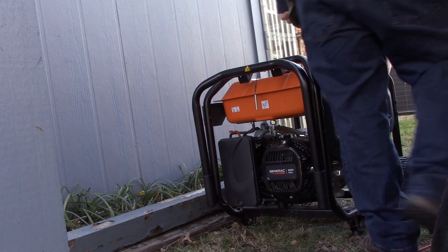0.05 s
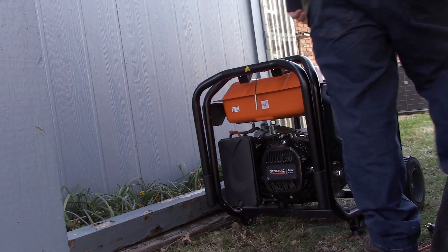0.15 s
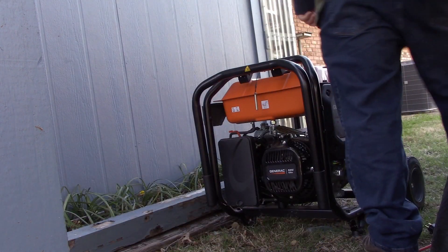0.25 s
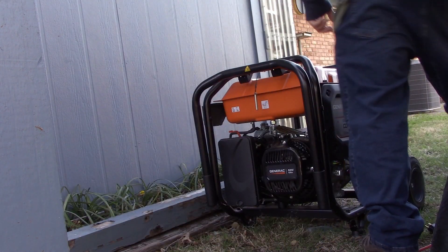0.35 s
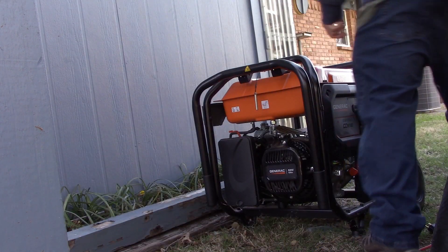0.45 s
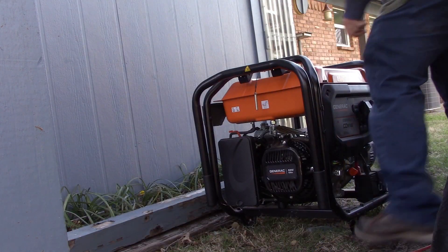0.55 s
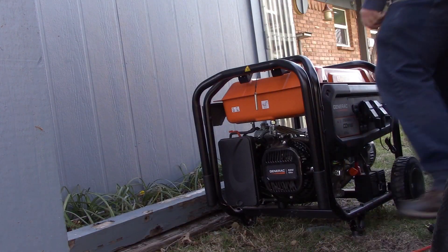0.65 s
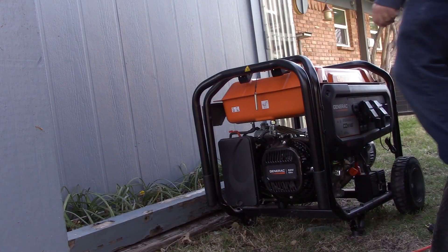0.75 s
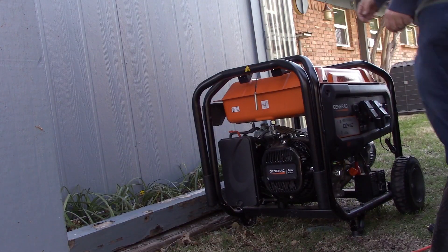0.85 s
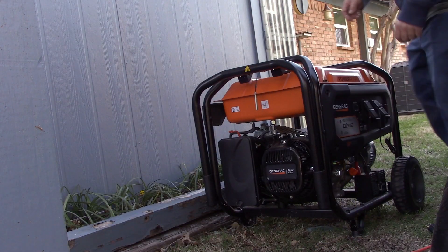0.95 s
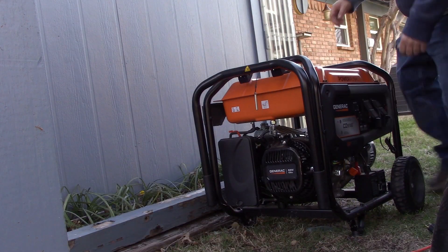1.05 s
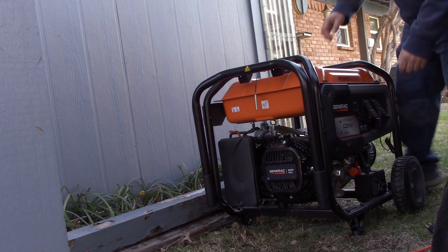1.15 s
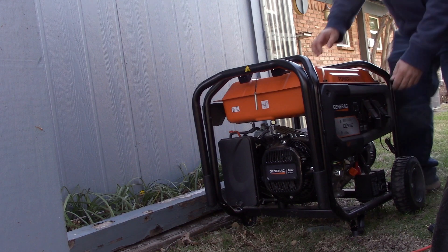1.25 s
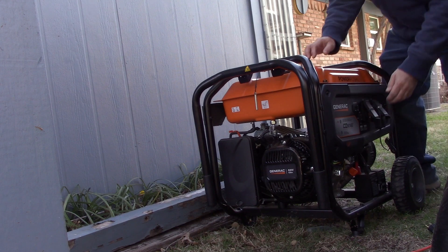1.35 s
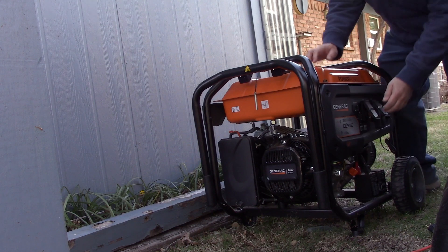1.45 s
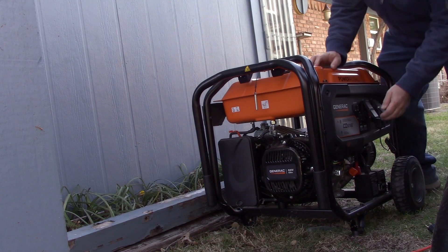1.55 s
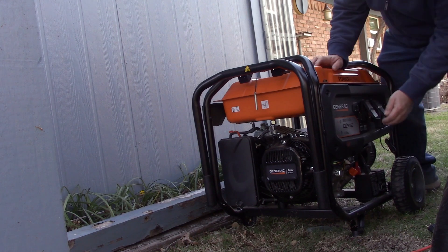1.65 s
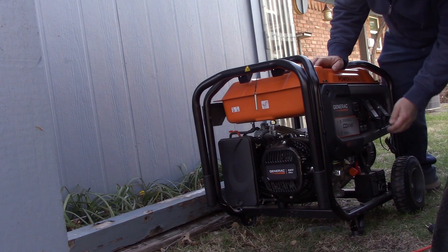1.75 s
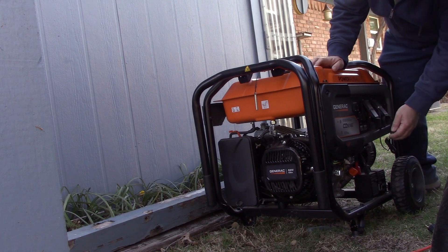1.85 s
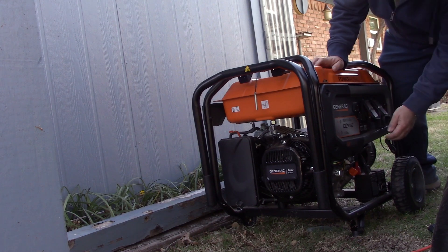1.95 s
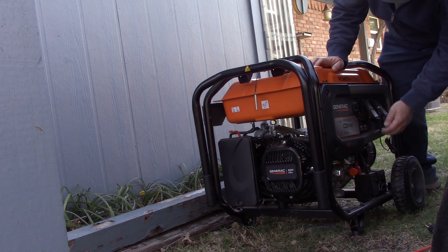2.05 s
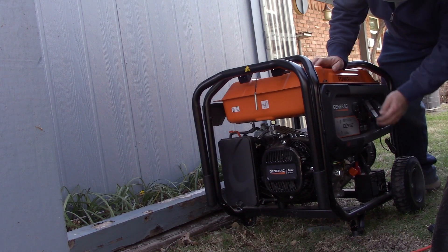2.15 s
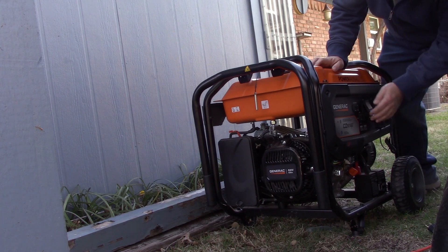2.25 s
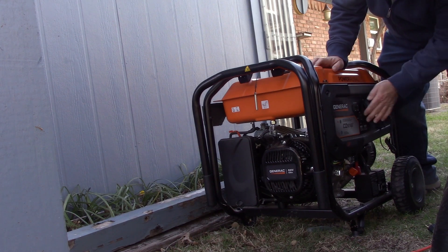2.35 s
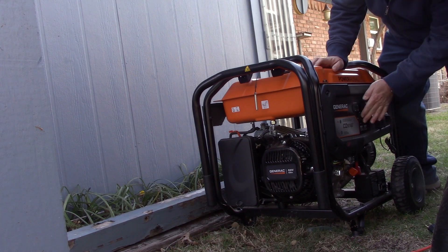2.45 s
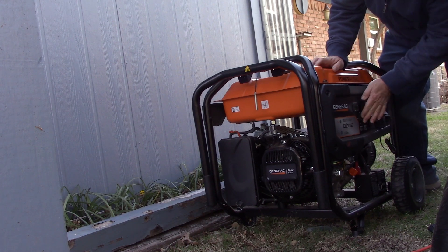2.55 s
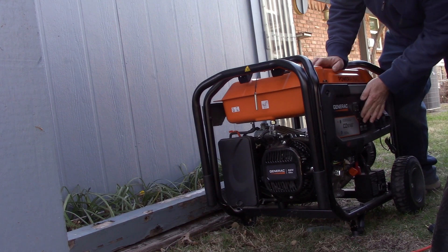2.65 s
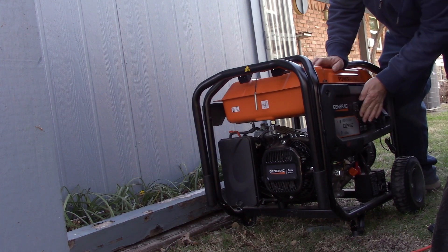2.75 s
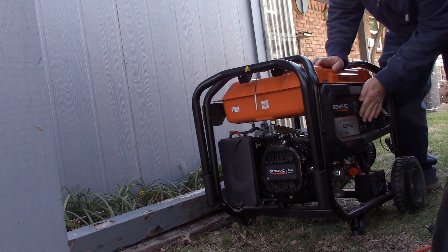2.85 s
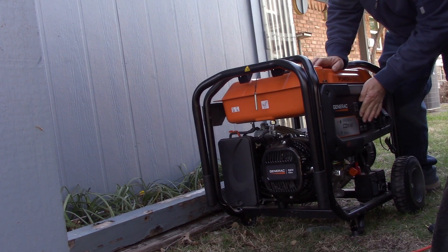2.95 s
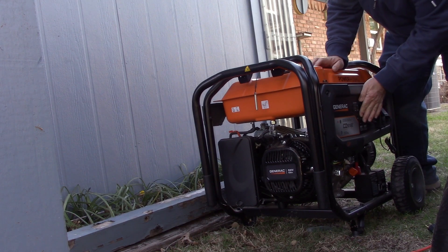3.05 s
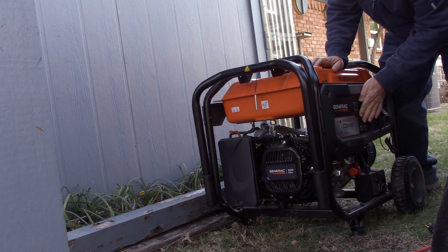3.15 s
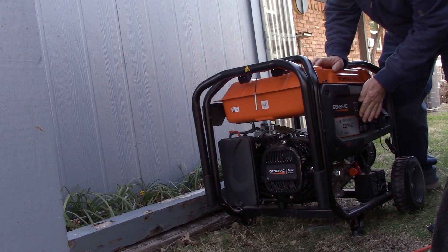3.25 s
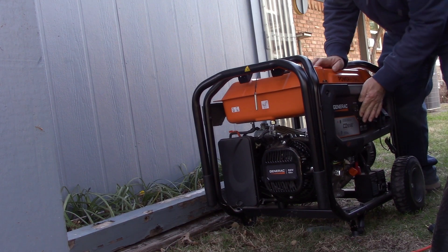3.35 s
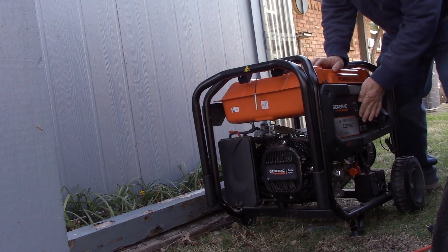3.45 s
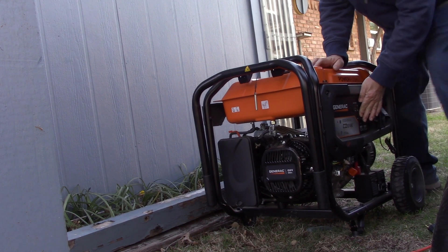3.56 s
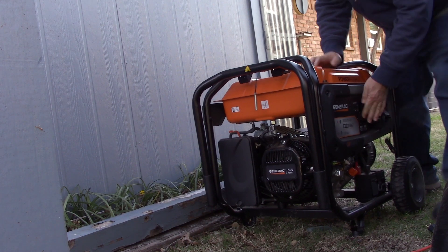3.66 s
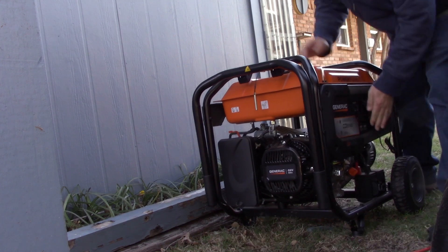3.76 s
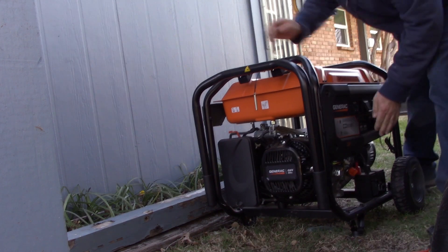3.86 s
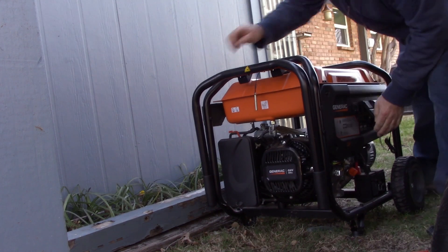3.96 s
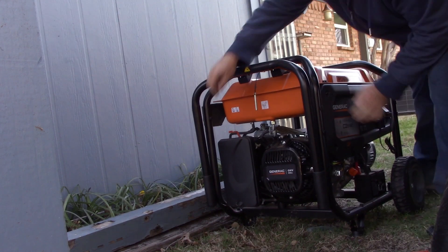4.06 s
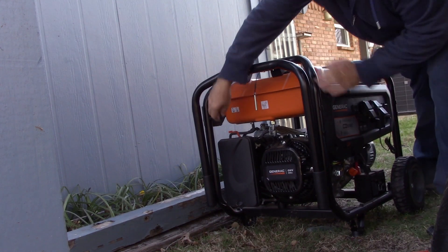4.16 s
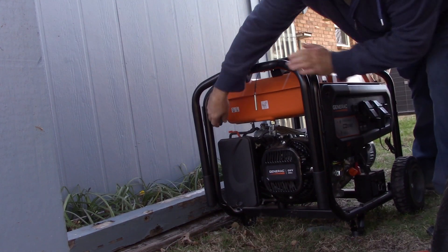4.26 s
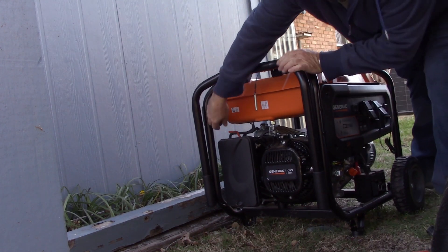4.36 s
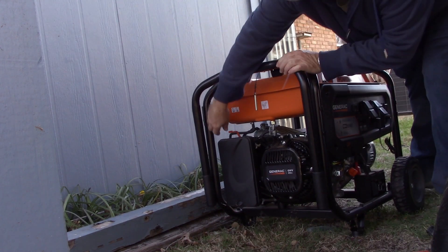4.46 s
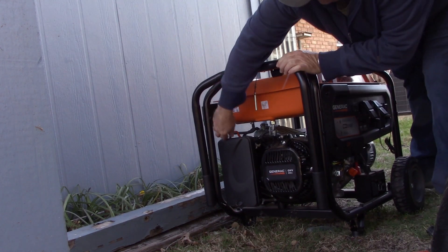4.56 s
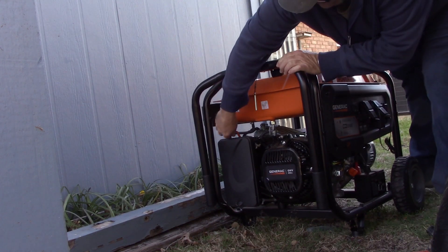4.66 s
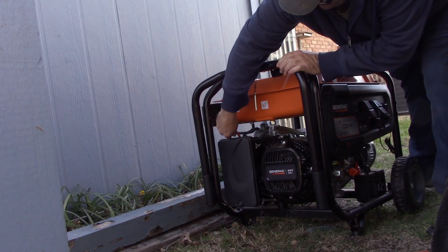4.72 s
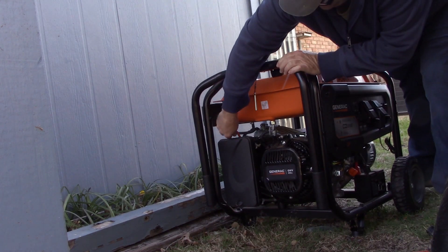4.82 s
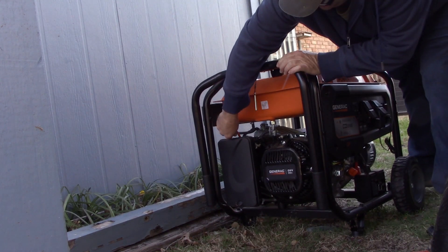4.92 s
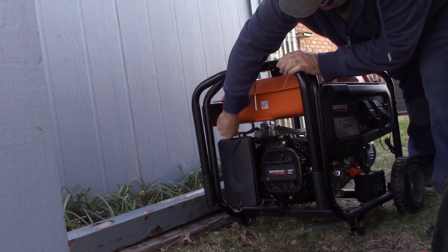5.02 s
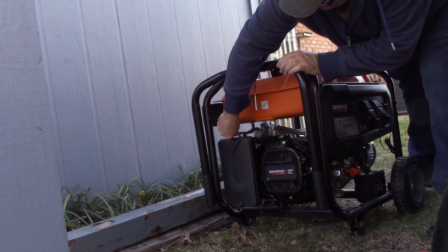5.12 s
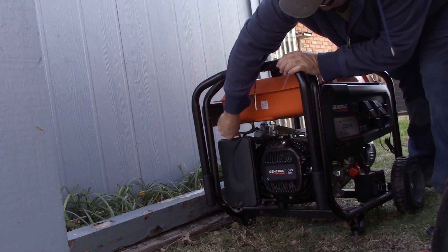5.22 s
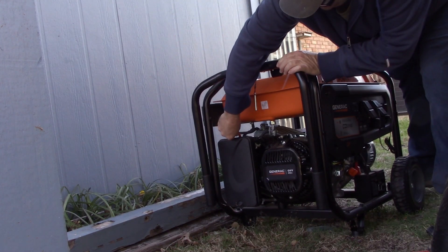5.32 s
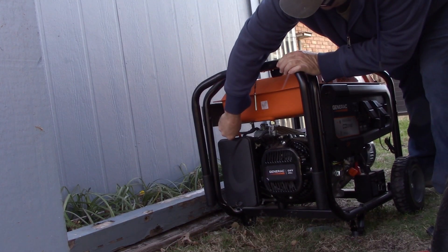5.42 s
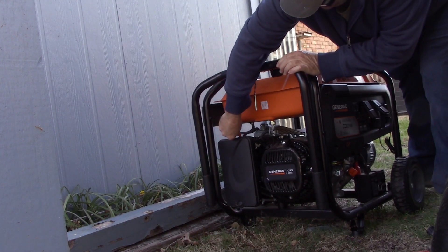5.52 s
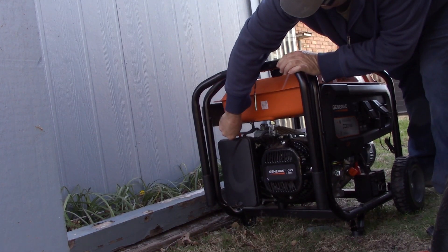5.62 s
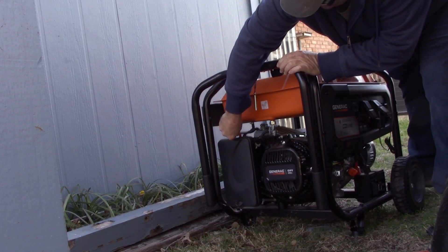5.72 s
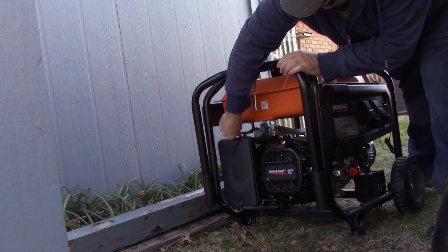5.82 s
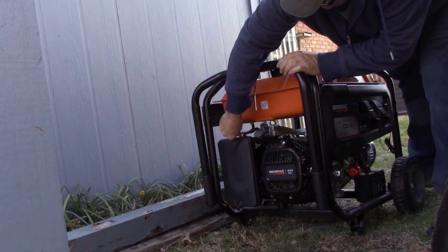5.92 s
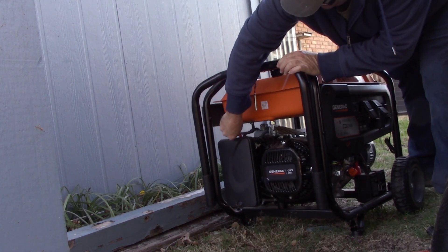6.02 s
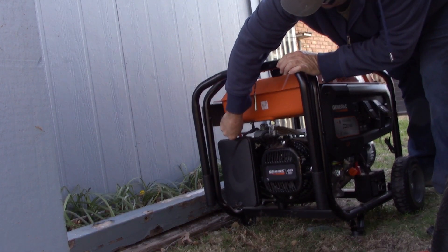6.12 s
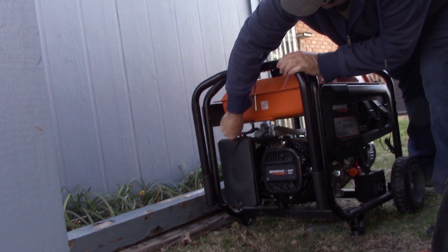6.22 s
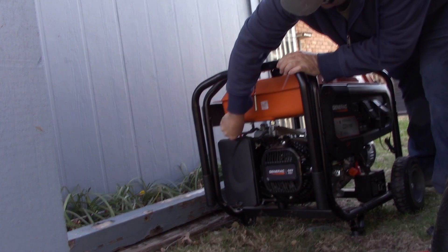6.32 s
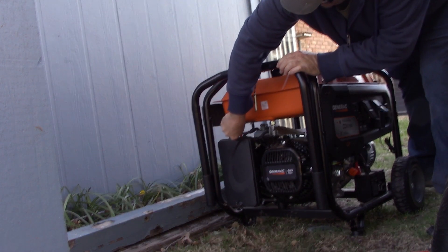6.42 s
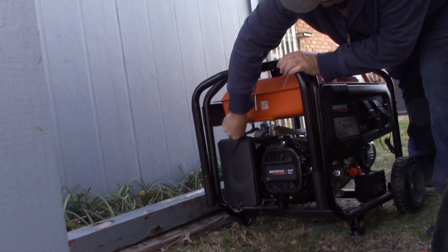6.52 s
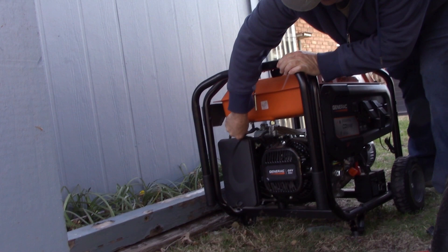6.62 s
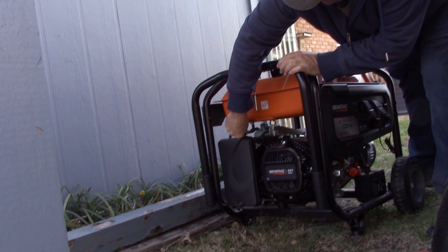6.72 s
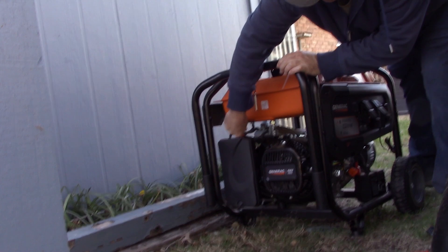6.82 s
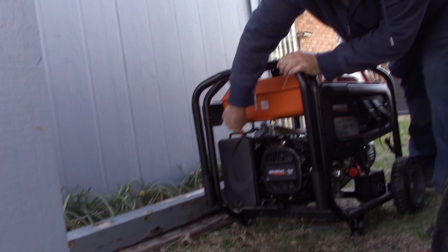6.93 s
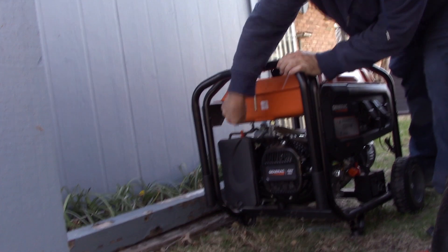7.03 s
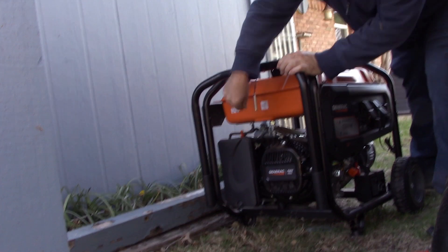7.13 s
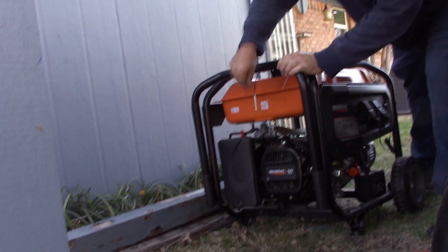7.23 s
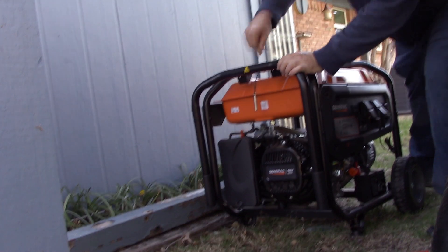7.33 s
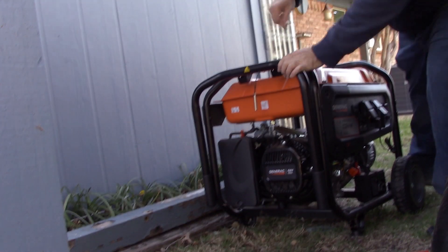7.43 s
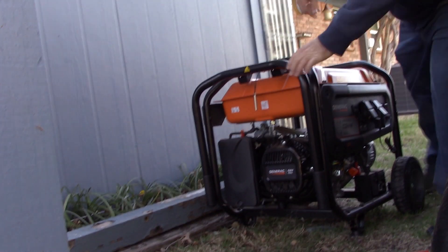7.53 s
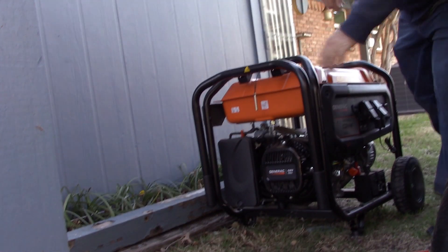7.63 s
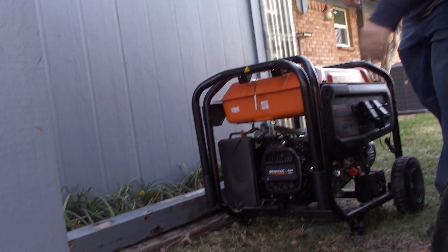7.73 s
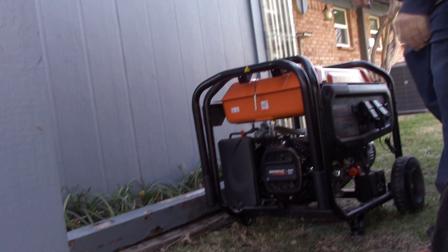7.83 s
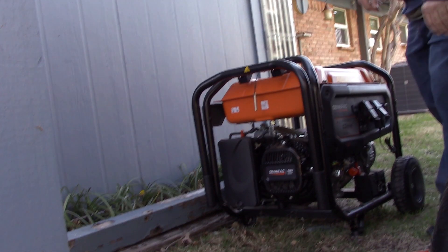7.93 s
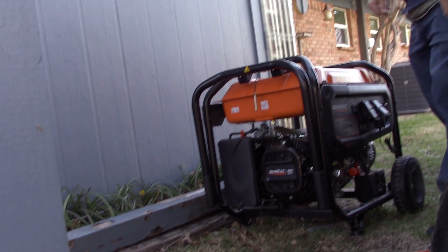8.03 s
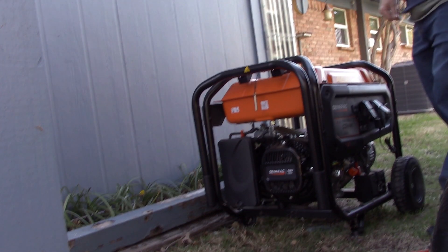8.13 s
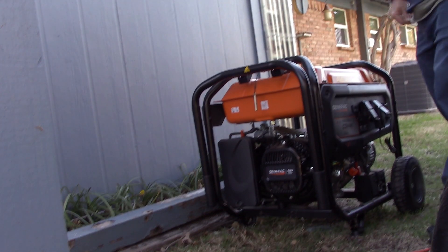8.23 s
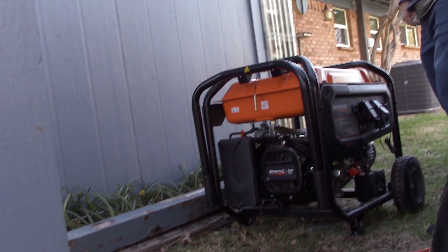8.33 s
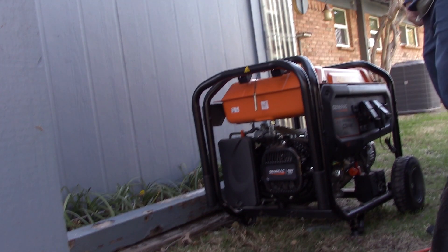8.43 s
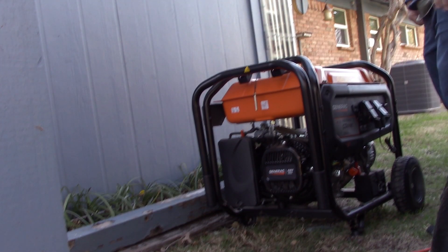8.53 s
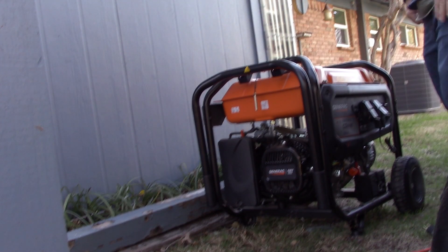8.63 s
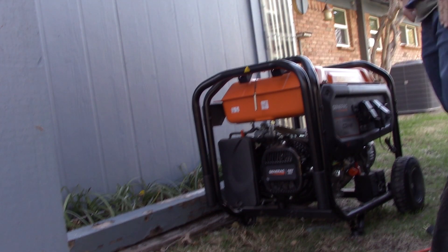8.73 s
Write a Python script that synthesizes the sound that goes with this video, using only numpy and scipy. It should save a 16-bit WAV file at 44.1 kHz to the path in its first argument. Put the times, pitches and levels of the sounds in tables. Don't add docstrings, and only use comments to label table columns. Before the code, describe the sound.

Faint neighbourhood hum, insects, soft shoes in grass and bird chirps open the scene. Rhythmic dry squeaks quicken, followed by a violent clank and short gear-grinding crank with whine and squeal. Puffs cough out; the level drops abruptly as the small engine starts slowly, lumpy and thudding with hissing intake gulps, then accelerates to a constant muffled drone with clatter. Close outdoors, source slightly left.

```python
import sys
import numpy as np
from scipy import signal
from scipy.fft import rfft, irfft, next_fast_len
from scipy.io import wavfile
from scipy.ndimage import uniform_filter1d, map_coordinates

SR = 44100
rng = np.random.default_rng(int(sys.argv[2]) if len(sys.argv) > 2 else 0)


def convert_level_to_amplitude(level_db):
    exponent = np.asarray(level_db, float) / 20
    return 10 ** exponent


def persist_wave(psi):
    counts = np.round(np.clip(psi, -1, 1) * 32767).astype(np.int16)
    wavfile.write(sys.argv[1], SR, np.atleast_2d(counts).T)


N = 387198
T = np.arange(N) / SR


def unit(x):
    return x / np.sqrt(np.mean(x ** 2) + 1e-20)


def along(points, hz):
    f, v = np.transpose(points)
    return np.interp(np.log(hz + 1), np.log(f + 1), v)


def curves(rows):
    s, *cols = np.transpose(rows)
    return [np.interp(T, s, c) for c in cols]


def during(rows):
    return (T >= rows[0][0]) & (T <= rows[-1][0])


def arch(start, peak, end, db, drop_db=-20):
    shape_db = np.interp(T, [start, peak, end], [drop_db, 0, drop_db])
    return ((T >= start) & (T <= end)) * convert_level_to_amplitude(db + shape_db)


def wobble(rate, size=N):
    knots = rng.standard_normal(int(size * rate / SR) + 4)
    return map_coordinates(knots, [T[:size] * rate])


def filtered(x, response):
    m = next_fast_len(N + 8192)
    return irfft(rfft(x, m) * response(np.fft.rfftfreq(m, 1 / SR)), m)[..., :N]


def modes(table):
    def response(f):
        return sum((-1) ** k * convert_level_to_amplitude(db) * 1j * f * w / (c * c - f * f + 1j * f * w)
                   for k, (c, w, db) in enumerate(table))
    return response


def noise(spectrum, peaks=None, peak_db=0):
    def colour(f):
        lift = 1 + convert_level_to_amplitude(peak_db) * np.abs(modes(peaks)(f)) if peaks else 1
        return convert_level_to_amplitude(along(spectrum, f)) * lift
    return unit(filtered(rng.standard_normal(N), colour))


def kicks(times, sizes):
    return np.bincount(np.clip((np.asarray(times) * SR).astype(int), 0, N - 1), sizes, N)


def tone(hz, gain, blur_hz, flutter_db, flutter):
    phase = 2 * np.pi * np.cumsum(hz + blur_hz * wobble(300)) / SR
    return gain * convert_level_to_amplitude(3 + flutter_db * np.tanh(wobble(flutter))) * np.sin(phase)


# (f/Hz, level/dB)
INSECTS = [(2659, -63.5), (2821, -74), (3025, -68), (4350, -58.5), (4479, -90), (4613, -67.5)]
# (from t/s, to t/s, level/dB, fade/dB per s)
STROPHES = [
    (0, 0.957, -4, -11.5),
    (0.989, 2.706, 0.5, -10.5),
]
# (f/Hz, level/dB per Hz)
YARD = [(15, -52), (38, -13), (161, 4.5), (256, -4.5), (476, -13.5), (1070, -19.5), (1230, -21.5),
        (2480, -25.5), (2690, -22.5), (4140, -27.5), (4490, -27.5), (4870, -29), (10100, -42.5),
        (13600, -53), (16000, -81)]
# (t/s, peak level/dB)
STEPS = [
    (0.0194, -48),
    (0.5257, -50),
    (1.0494, -59),
    (1.1994, -57),
    (1.3094, -58),
    (1.3947, -60),
]
YARD_DB = -48


def yard():
    def turn(f):
        likeness = along([(100, .97), (1000, 0.89), (8000, 0.17)], f)
        return np.arccos(np.clip(likeness, -1, .97)) / 2
    hum = np.array([noise(YARD), noise(YARD)])
    mid, side = filtered(hum, lambda f: np.array([np.cos(turn(f)), np.sin(turn(f))]))
    hum = convert_level_to_amplitude(YARD_DB + 3.5 + 0.44 * wobble(9.6)) * np.array([mid + side, mid - side])
    chorus = sum(convert_level_to_amplitude(db + 3 + wobble(25)) * np.sin(2 * np.pi * (hz * T + .03 * wobble(40)))
                 for hz, db in INSECTS)
    vigour = convert_level_to_amplitude(-14.0) + sum((T >= a) * (T < b) * convert_level_to_amplitude(db + fade_db * (T - a))
                              for a, b, db, fade_db in STROPHES)
    s, db = np.transpose(STEPS)
    crunch = signal.fftconvolve(kicks(s, convert_level_to_amplitude(db - 12)), np.hanning(round(.08 * SR)), "same")
    grass = noise([(2000, -120), (3000, 3), (9000, -3), (15000, -10)])
    crunch = crunch * grass * convert_level_to_amplitude(3 * wobble(300))
    return hum + vigour * chorus * convert_level_to_amplitude([[-1.5], [1.5]]) + crunch


# (t/s, length/s, from f/Hz, to f/Hz, level/dB)
NOTES = [(.665, .027, 4500, 3250, -52), (.742, .03, 4900, 4200, -56), (.77, .06, 4700, 4400, -62),
         (.66, .04, 4700, 5300, -62), (.7, .04, 5200, 5950, -61), (.03, .04, 3500, 4000, -60),
         (.075, .04, 4000, 3350, -60), (.272, .04, 5150, 5150, -65), (.41, .22, 4380, 4520, -63),
         (.68, .03, 4700, 5200, -60), (.75, .07, 4900, 4700, -60), (.99, .08, 2660, 2660, -58),
         (.81, .03, 4100, 3200, -58)]
# (t/s, f/Hz, level/dB)
CALL = [
    (.718, 3460, -51),
    (.728, 4400, -44),
    (.739, 4560, -46),
    (.748, 3620, -39.5),
    (.765, 3280, -48),
    (.787, 2930, -48.5),
    (.818, 3680, -44.5),
    (.832, 3700, -61),
    (.86, 3640, -72),
]


def birds():
    hz, db = curves(CALL)
    song = tone(hz, during(CALL) * convert_level_to_amplitude(db), 62, 2.9, 119.7)
    for s, length, from_hz, to_hz, db in NOTES:
        glide = np.interp(T, [s, s + length], [from_hz, to_hz])
        swell = arch(s, s + 0.25 * length, s + length, db, drop_db=-6.0)
        song = song + tone(glide, swell, 66, 5.2, 119.5)
    return song + .5 * np.roll(song, round(.017 * SR))


# (t/s, squeak level/dB)
PULLEY = [(1.7131, -55), (1.9043, -43), (2.0215, -37), (2.1026, -37), (2.1797, -38), (2.248, -39.5),
          (2.307, -44), (2.3742, -46), (2.4417, -46), (2.4936, -48), (2.5524, -48), (2.6165, -49),
          (2.675, -46)]
# (f/Hz, level/dB per Hz)
BEARING = [(900, -120), (1200, -0.5), (1900, -8), (2700, 5), (3300, -4), (4200, -20), (5800, -17),
           (7000, -16), (8000, -29), (11000, -40), (15000, -48)]
KNOCK_DB, SCRAPE_DB, CHIRP_DB = -50, -53.5, -64
STROKE_DB = 3.5
OVERTONE_DB, OVERTONE_GROWS = -60.5, 0.91


def pulley():
    out, rasp, t = np.zeros(N + SR), np.zeros(N + SR), np.arange(SR // 8) / SR

    def swell(rise, t60):
        return (1 - np.exp(-t / rise)) ** 2 * convert_level_to_amplitude(-60 * t / t60)

    def glide(hz, fall, blur):
        return 2 * np.pi * np.cumsum(hz * (1 - fall * t) + blur * wobble(377, size=len(t))) / SR

    def add(track, start, sound):
        track[round(start * SR):][:len(t)] += sound

    for s, squeak_db in PULLEY:
        knock_db, scrape_db, chirp_db = np.array([KNOCK_DB, SCRAPE_DB, CHIRP_DB]) + rng.normal(0, 0.8, 3)
        overtone_db = OVERTONE_DB + OVERTONE_GROWS * (squeak_db + 45.0)
        slip = glide(2415, 0.21, 63)
        squeak = convert_level_to_amplitude(squeak_db - 2) * (np.sin(slip) + .35 * np.sin(1.09 * slip))
        squeak = squeak * convert_level_to_amplitude(3 * wobble(110, size=len(t)))
        overtones = np.sin(3 * slip) + 0.18 * np.sin(4 * slip) + .3 * np.sin(2 * slip) + .7 * np.sin(1.1 * slip)
        overtones = convert_level_to_amplitude(overtone_db + 14.5) * overtones
        scrape = convert_level_to_amplitude(scrape_db + 4) * convert_level_to_amplitude(STROKE_DB + 2) * np.sin(glide(3050, 22, 45))
        knock = convert_level_to_amplitude(knock_db + 6) * np.sin(glide(1680, 6, 80))
        chirp = convert_level_to_amplitude(chirp_db + 4) * np.sin(glide(6280, .3, 60))
        add(out, s - .011, squeak * (2.2 * swell(.009, .11) + .14 * swell(.0092, .55)))
        add(out, s - .011, .55 * overtones * swell(.008, .1))
        add(out, s - .004, scrape * swell(.006, .3) * (t < .022))
        add(out, s - .022, knock * swell(.005, .15))
        add(out, s - .012, chirp * swell(.004, .12))
        add(rasp, s - .017, convert_level_to_amplitude(scrape_db + 12.0) * swell(0.0055, 0.15))
    return out[:N] + rasp[:N] * noise(BEARING)


# (t/s, peak level/dB)
BLOWS = [
    (2.692, -29),
    (2.703, -22),
    (2.72, -6),
    (2.725, -3),
    (2.729, -5),
    (2.757, -13),
    (2.785, -15),
    (3.3325, -7.5),
    (3.385, -20),
    (3.519, -18),
]
# (f/Hz, level/dB, t60/s)
STEEL = [(285, -34, .5), (676, -4, 0.2), (1238, 0, 0.098), (1470, 5.5, 0.046), (1740, -18, 0.076),
         (2990, 2, 0.066), (2770, -12, 0.095), (3320, -23, 0.2), (3700, -2.5, 0.16), (4730, -12, .2),
         (6240, -22, 0.1), (7300, -24, 0.18), (7730, -11, 0.15)]
MESH_S = 2.938
RELEASE_DULL_DB, RELEASE_HZ = -14, 1600


def pinion_blows():
    out, t = np.zeros(N + SR), np.arange(SR // 4) / SR
    for s, db in BLOWS:
        ring = 0
        for hz, level, t60 in STEEL:
            dull_db = RELEASE_DULL_DB * (s > MESH_S and hz < RELEASE_HZ)
            fade = convert_level_to_amplitude(level + dull_db + rng.normal(0, 2.5) - 60 * t / min(t60, .14))
            ring = ring + fade * np.sin(2 * np.pi * hz * t)
        crack = signal.lfilter([.6], [1, -.4], rng.standard_normal(len(t)))
        crack = 3.34 * convert_level_to_amplitude(-60 * t / 0.062) * crack
        out[round(s * SR):][:len(t)] += convert_level_to_amplitude(db - 15) * (ring + crack)
    return filtered(out[:N], lambda f: 1j * f / (500 + 1j * f) / (1 + (f / 9000) ** 4))


# (t/s, level/dB)
GRIND = [
    (2.702, -25),
    (2.726, -11),
    (2.742, -17.5),
    (2.786, -19.5),
    (3.244, -22.5),
    (3.331, -25.5),
    (3.334, -20),
    (3.375, -28.5),
    (3.444, -27.5),
    (3.48, -45),
]
# (t/s, teeth per s)
MOTOR = [(2.735, 377), (2.76, 745), (2.8, 1006), (2.83, 1308), (2.86, 1415), (2.92, 1390), (2.99, 1420),
         (3.02, 1510), (3.08, 1605), (3.12, 1625), (3.19, 1710), (3.21, 1480)]
# (f/Hz, level/dB per Hz)
GEARS = [(35, -65), (60, -51), (272, -34), (362, -16.5), (815, -7), (1310, -9), (1640, -4.5), (1840, -10.5),
         (2840, -8.5), (5500, -18), (7150, -63), (12100, -120)]
# (f/Hz, level/dB per Hz)
BRUSHES = [(2350, -14.5), (4000, 3), (5350, -10), (7480, 0.5), (8450, -3), (10500, -6), (12300, -22.5),
           (14200, -21), (16000, -48)]
# (f/Hz, width/Hz, level/dB)
HOUSING = [(1980, 110, 4.5), (2710, 84, 2.5), (3370, 64, -2), (4330, 39, -29), (5880, 49, 1.5),
           (6400, 47, -25), (6680, 59, -5), (7600, 41, -17), (10500, 41, -15)]
# (t/s, level/dB)
THUDS = [
    (2.74, -26),
    (2.762, -27),
    (2.785, -29),
    (3.292, -33),
    (3.35, -39),
    (3.43, -38),
]
THUD_T60_S, FRAME_DB = .22, -42
BRUSH_DB, STALLED_DB, COAST_DB = -27.5, -12, -12
THROW_DB, THROW_END_S = -25, 2.742
KEY_OFF_S, BRUSH_FADE_S = 3.19, .06


def starter_grind():
    gears_db, teeth = curves(GRIND)[0], curves(MOTOR)[0]
    power = np.clip(1 - (T - KEY_OFF_S) / BRUSH_FADE_S, 0, 1)
    powered = convert_level_to_amplitude(BRUSH_DB + np.interp(teeth, [950, 1300], [STALLED_DB, 0]))
    brushes = power * powered + (1 - power) * convert_level_to_amplitude(gears_db + COAST_DB)
    brushes = np.where(T < THROW_END_S, convert_level_to_amplitude(THROW_DB), brushes)
    grit = convert_level_to_amplitude(1.3 * wobble(70) + 2 * wobble(400))
    grind = convert_level_to_amplitude(gears_db - 2.5) * noise(GEARS, HOUSING, peak_db=0)
    grind = grind + brushes * convert_level_to_amplitude(-.4) * noise(BRUSHES, HOUSING, peak_db=8)
    jolts = convert_level_to_amplitude(FRAME_DB) + sum(arch(s - .015, s, s + THUD_T60_S / 2, db, drop_db=-40) for s, db in THUDS)
    frame = noise([(120, -120), (190, -23.0), (270, 8.0), (340, -0.5), (800, -18), (1300, -120)])
    return (grind * grit + jolts * convert_level_to_amplitude(-1.5) * frame) * during(GRIND)


# (f/Hz, from t/s, peak t/s, to t/s, level/dB)
RINGING = [(285, 2.74, 2.765, 2.805, -22.5), (720, 2.72, 2.745, 2.77, -24),
           (1239, 2.754, 2.764, 2.8, -18.5), (1650, 2.76, 2.768, 2.81, -27), (3480, 2.83, 2.86, 2.92, -28),
           (2030, 3.333, 3.338, 3.365, -27.5), (2100, 3.44, 3.455, 3.47, -32),
           (3400, 2.93, 2.95, 3.02, -31), (4330, 2.92, 2.96, 3.05, -42), (7260, 3.0, 3.18, 3.225, -35),
           (3350, 3.05, 3.15, 3.2, -33)]
# (multiple of tooth rate, from t/s, peak t/s, to t/s, level/dB)
TEETH = [
    (1.59, 2.8, 2.83, 2.87, -25),
    (1.52, 2.87, 2.9, 2.93, -29),
    (2.53, 2.78, 2.797, 2.82, -27),
    (2.6, 2.84, 2.88, 2.92, -30),
]
# (from t/s, peak t/s, to t/s, level/dB, level at the ends/dB)
SQUEAL = [
    (2.928, 2.938, 2.95, -21, -8),
    (2.948, 2.963, 3.005, -18, -11),
    (2.99, 3.05, 3.5, -30, -6),
]
# (from t/s, peak t/s, to t/s, level/dB)
BITES = [
    (2.93, 2.98, 3.0, -28),
    (3.005, 3.02, 3.07, -23),
    (3.07, 3.095, 3.128, -19),
    (3.132, 3.146, 3.16, -19.5),
    (3.16, 3.183, 3.21, -20.5),
]
SQUEAL_HZ, SQUEAL_END_S = 2840, 3.31


def starter_tones():
    teeth = curves(MOTOR)[0]
    whine = sum(arch(*swell, drop_db=-5) for swell in BITES)
    squeal = sum(arch(*row) for row in SQUEAL) * (T < SQUEAL_END_S)
    tones = tone(teeth, whine, 35, 3, 110) + tone(SQUEAL_HZ, squeal, 55, 5, 130)
    for k, *swell in TEETH:
        tones = tones + tone(k * teeth, arch(*swell, drop_db=-12), 90, 5, 90)
    for hz, *swell in RINGING:
        tones = tones + tone(hz, arch(*swell, drop_db=-8), .025 * hz, 5, 110)
    return tones


# (f/Hz, width/Hz, level/dB)
MUFFLER = [(232, 70, 0), (322, 84, 2.5)]


def silencer(f):
    return modes(MUFFLER)(f) / (1 + 1j * f / 600) ** 3 * (1j * f / (170 + 1j * f)) ** 2


# (t/s, level/dB)
COUGHS = [
    (3.291, -14.5),
    (3.402, -20),
    (3.355, -22),
    (3.435, -18.5),
]


def first_coughs():
    s, db = np.transpose(COUGHS)
    return filtered(kicks(s, convert_level_to_amplitude(db + 37.5)), lambda f: silencer(f) + modes([(95, 90, -12)])(f))


STUMBLE = (13, 35)


def pattern(cycle, table, scatter_db, jitter):
    place, db = np.transpose(table)
    turns = np.arange(int(cycle[-1]) + 1)[:, None] + place
    uneven = np.interp(turns, [STUMBLE[1], STUMBLE[1] + 2], [2, 1])
    chance = rng.standard_normal(turns.shape + (2,))
    times = np.interp(turns + jitter * uneven * chance[..., 0], cycle, T)
    sizes = convert_level_to_amplitude(db + scatter_db * np.sqrt(uneven) * chance[..., 1])
    return kicks(times.ravel(), sizes.ravel())


def per_beat(speed):
    return np.sqrt(30 / np.maximum(speed, 8))


# (place 0-1, level/dB)
BEATS = [(0, 0), (.5, -17), (.7, -14), (.86, -19)]
# (t/s, place 0-1, level under the beat/dB)
AFTERBURN = [(3.46, 0.3, -7), (3.9, 0.33, -6), (4.3, 0.39, -8.5), (4.7, 0.25, -5), (5.1, 0.39, -5.5),
             (5.5, 0.34, -7), (5.75, .33, -1.5), (6.05, .28, -3), (6.3, 0.36, -1), (6.6, .43, -3),
             (6.7, 0.3, -4.5)]
# (f/Hz, width/Hz, level/dB)
CHAMBER = [(275, 170, -5)]
AFTERBURN_THUD = 0.82
LOPE_DB, CHOKE_LOPE_DB = -17, 7


def exhaust(speed, cycle, closed):
    lope_db = LOPE_DB + CHOKE_LOPE_DB * closed * np.interp(speed, [24, 29], [1, .4])
    lead = -round(.004 * SR)
    beats = np.roll(pattern(cycle, BEATS, 1, .0022) * per_beat(speed), lead)
    place, late_db = curves(AFTERBURN)
    late = pattern(cycle - place, [(0, 0)], 1.2, .005) * per_beat(speed) * convert_level_to_amplitude(late_db)
    late = np.roll(late, lead)
    chamber = filtered(closed * late, lambda f: silencer(f) * modes(CHAMBER)(f))
    beat_sound = unit(filtered(beats + late, silencer) + chamber)

    def thud(f):
        body = modes([(190, 220, 0), (385, 70, 1)])(f)
        return body * (1j * f / (80 + 1j * f)) ** 3 / (1 + 1j * f / 600) ** 2
    lope = unit(filtered(beats + AFTERBURN_THUD * late, thud)) * convert_level_to_amplitude(lope_db)
    puff = .2 * convert_level_to_amplitude(2 * wobble(45)) * noise([(60, -120), (150, -10), (300, 0), (420, -8), (700, -120)])
    return beat_sound + lope + puff, np.sqrt(1 + convert_level_to_amplitude(2 * lope_db))


# (multiple of the cycle, level under the exhaust/dB)
SHAKE = [(1, -61), (2, -14.5), (3, -26), (4, -11.5), (6, -52)]
# (multiple of the cycle, level/dB)
WHIRR = [(17, -21), (18, -17), (20, -17), (22, -19), (24, -19), (25, -18), (26, -14), (30, -17), (32, -15),
         (36, -13), (38, -17), (40, -11), (42, -18), (48, -19), (58, -19), (68, -18)]
# (multiple of the cycle, level under the exhaust/dB)
SHUDDER = [(5, -9), (6, -8.5), (7, -13.5), (8, -9), (9, -11.5), (13, -15)]


def frame_shake(speed, cycle, closed):
    growth_db = 53.0 * np.log10(speed / 30 + 0.008)
    shake = sum(convert_level_to_amplitude(db + growth_db) * np.sin(2 * np.pi * k * cycle) for k, db in SHAKE + WHIRR)
    rocking = sum(convert_level_to_amplitude(db + 2.5 * np.tanh(wobble(9))) * np.sin(2 * np.pi * (k * cycle + .06 * wobble(6)))
                  for k, db in SHUDDER)
    return shake + closed ** 2 * rocking


# (t/s, level/dB)
THROTTLE = [(4.25, 0), (4.35, 1.5), (4.7, 3), (5.6, 3), (5.7, 1), (6.16, 1), (6.2, -9), (6.3, -9),
            (6.33, 4), (6.37, -1), (6.55, 0), (6.65, -6)]
HISS_DB, CHOKE_HISS_DB, WEAK_GULP_DB = -58, 8, -11
MISFIRE_S, MISFIRE_WIDTH_S, MISFIRE_DB = 7.5, 0.079, -3
GULP_TAIL, GULP_FALL_DB = 0.27, -56


def intake_gulps(speed, cycle, closed):
    choke_db = HISS_DB + CHOKE_HISS_DB * closed + np.interp(speed, [7.5, 12.5], [WEAK_GULP_DB, 0])
    choke_db = choke_db + MISFIRE_DB * np.clip(1 - np.abs(T - MISFIRE_S) / MISFIRE_WIDTH_S, 0, 1)
    opened = cycle + .32
    fired = np.floor(opened)
    skipped = (fired >= STUMBLE[0]) & (fired <= STUMBLE[1]) & (fired % 2 == 1)
    since = opened - fired + skipped
    rise = np.sin(np.pi / 2 * np.minimum(since / .2, 1)) ** 2
    past = np.clip(since - .2, 0, 2)
    fall = (1 - GULP_TAIL) * convert_level_to_amplitude(GULP_FALL_DB * past) + GULP_TAIL * convert_level_to_amplitude(-20 * past ** 1.7)
    return rise * convert_level_to_amplitude(curves(THROTTLE)[0]) * fall * convert_level_to_amplitude(choke_db)


# (place in the cycle 0-1, level/dB)
TAPS = [(-.04, -31), (0.139, 11), (0.331, 4), (0.551, 22.5), (.7, 16), (0.842, 21.5)]
# (f/Hz, width/Hz, level/dB)
CASING = [(520, 28, -4), (1274, 31, -12), (1710, 170, -3.5), (2071, 17, 3.5), (2710, 37, -16),
          (2900, 17, -7), (3200, 130, -9.5), (6980, 68, -14), (7820, 160, -15), (8550, 72, -33)]
# (f/Hz, level/dB per Hz)
CLATTER = [(250, -23), (420, -4.5), (528, -1.5), (578, -4), (761, -4.5), (859, -8.5), (1240, -7),
           (1530, -9), (2820, -8), (5340, -21), (9530, -27), (14000, -47.5), (16000, -46)]
CLATTER_DB, CLATTER_DB_PER_OCTAVE, CLATTER_LEAST_DB, CHOKE_MUTES_DB = -39.5, 7, -52.5, -5
PULL_DB, FULL_PULL = 4, 35
FIRING_SWELL_DB = 1.2


def clatter(speed, cycle, closed, gulps):
    level_db = CHOKE_MUTES_DB * closed + CLATTER_DB + CLATTER_DB_PER_OCTAVE * np.log2(speed / 27.23 + 1e-3)
    pull = np.clip(uniform_filter1d(np.gradient(speed) * SR, SR // 8) / FULL_PULL, 0, 1)
    level_db = np.maximum(level_db + PULL_DB * pull, CLATTER_LEAST_DB)
    taps = pattern(cycle, TAPS, 0.55, 0.0018) * per_beat(speed)
    ring = unit(filtered(taps, modes(CASING)))
    seat = pattern(cycle, [(-.05, -5), (.06, 0), (.3, -5)], 1.5, .004)
    tick = unit(signal.lfilter([1], [1, -np.exp(-1 / (.01 * SR))], uniform_filter1d(seat, 90)))
    clicks = noise([(3000, -120), (4000, -3), (9000, 0), (12000, -7), (16000, -18)])
    clicks = .13 * tick * convert_level_to_amplitude(np.interp(speed, [20, 30], [3, -3])) * clicks
    rattle = noise(CLATTER, CASING, peak_db=-4.0) * convert_level_to_amplitude(FIRING_SWELL_DB * np.cos(2 * np.pi * cycle))
    rattle = rattle * (1 + 0.15 * convert_level_to_amplitude(50.5) * gulps)
    return convert_level_to_amplitude(level_db + 0.5) * (rattle + 0.22 * ring + clicks)


# (f/Hz, level/dB per Hz)
AIR = [(600, -120), (900, 12.5), (2000, -8), (4000, 5.5), (7000, 1.5), (9000, 4), (11000, -3), (12500, -10),
       (14000, -4), (16000, -22)]
# (f/Hz, width/Hz, level/dB)
TANK = [(527, 43, 1), (754, 56, 1), (1215, 40, -1)]
# (t/s, four-stroke cycles per s)
SPEED = [(3.46, 7.34), (3.6, 9.87), (3.75, 14.61), (3.9, 17.89), (4.6, 19.99), (5.1, 18.5), (5.45, 18.95),
         (6.12, 30.58), (6.2, 30.86), (6.35, 29.2), (6.5, 30.87), (7.4, 30.41), (8.78, 30.5)]
# (t/s, exhaust level/dB)
EFFORT = [(3.44, -59), (3.66, -49), (3.9, -46.5), (4.3, -46.5), (5.1, -44.5), (5.4, -43.5), (5.6, -40.5),
          (5.85, -40.5), (6.3, -40), (6.7, -40), (8.78, -39.5)]
# (t/s, share closed 0-1)
CHOKE = [
    (5.5, 1),
    (6.0, 0.87),
    (6.5, 0.65),
    (6.68, 0),
]
# (f/Hz, width/Hz, share taken out)
TONE_DIPS = [(183, 25, .3), (436, 28, .6), (577, 22, .5)]
FIRST_CYCLE, DRUMMING_DB = -.05, -11.5
TURN_DOWN_S, TURN_DOWN_DB = 3.446, -21


def engine():
    speed = curves(SPEED)[0] * during(SPEED)
    cycle = FIRST_CYCLE + np.cumsum(speed + 1e-6) / SR
    burn_db, closed = curves(EFFORT)[0], curves(CHOKE)[0]
    beats, beats_rms = exhaust(speed, cycle, closed)
    low = convert_level_to_amplitude(burn_db - 0.5) * (beats + frame_shake(speed, cycle, closed)) / beats_rms
    gulps = intake_gulps(speed, cycle, closed)
    hiss = convert_level_to_amplitude(4.5) * gulps * noise(AIR)
    drumming = unit(filtered(rng.standard_normal(N), modes(TANK)))
    drumming = convert_level_to_amplitude(burn_db + DRUMMING_DB + 1.9 * wobble(5.5)) * closed * drumming
    running = low + clatter(speed, cycle, closed, gulps) + hiss + drumming

    def dipped(f):
        return 1 - sum(share * modes([(hz, w, 0)])(f) for hz, w, share in TONE_DIPS)
    return filtered(running, dipped) * (T > TURN_DOWN_S) / convert_level_to_amplitude(TURN_DOWN_DB)


# (f/Hz, t60/s)
WALL = [(200, 0.054), (2000, 0.1), (10000, 0.14)]


def wall(x):
    hz, t, z = signal.stft(rng.standard_normal((2, SR // 3)), SR, nperseg=256)
    tail = signal.istft(z * convert_level_to_amplitude(-60 * t / along(WALL, hz)[:, None]), SR, nperseg=256)[1]
    late = np.pad(x, (300, 0))[None]
    return signal.fftconvolve(late, tail / np.linalg.norm(tail[0]), axes=1)[:, :N]


# (f/Hz, level/dB)
LEAN = [(60, 0), (180, 1.1), (550, 1), (1650, 2), (4970, 0.9), (15000, 1)]
# (f/Hz, likeness 0-1)
ALIKE = [(60, 0.99), (180, 0.94), (550, 0.88), (1650, 0.91), (4970, 0.71), (15000, 0.56)]


def placed(x, wet_db):
    direct = filtered(x, lambda f: convert_level_to_amplitude(along(LEAN, f) / 2 * [[1], [-1]]))
    echoes = filtered(wall(x), lambda f: np.sqrt(np.clip(1.03 - along(ALIKE, f), 0, 1)))
    return direct + convert_level_to_amplitude(wet_db) * echoes


def scene():
    song = birds()
    quiet = yard() + 0.73 * song + convert_level_to_amplitude(1.5) * wall(song) + placed(pulley(), wet_db=4)
    starter = pinion_blows() + starter_grind() + starter_tones()
    return quiet + placed(starter + first_coughs() + engine(), wet_db=-2.5)


def band_limit(x):
    return signal.sosfilt(signal.butter(12, 15830, fs=SR, output="sos"), x)


def record(dry):
    gain = convert_level_to_amplitude(np.interp(T, [TURN_DOWN_S, TURN_DOWN_S + 0.0038], [0, TURN_DOWN_DB]))
    mix = filtered(np.clip(dry * gain, -1, 1), lambda f: 1 / (1 + (f / 15700) ** 60))
    return band_limit(mix)


dry = scene()
out = record(dry)
persist_wave(out)
```